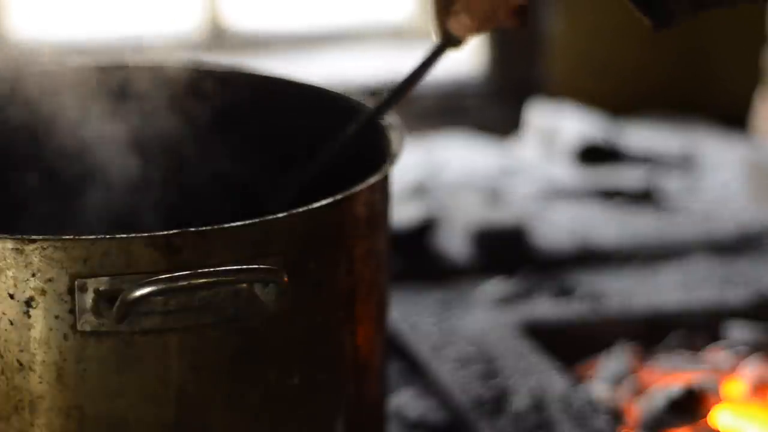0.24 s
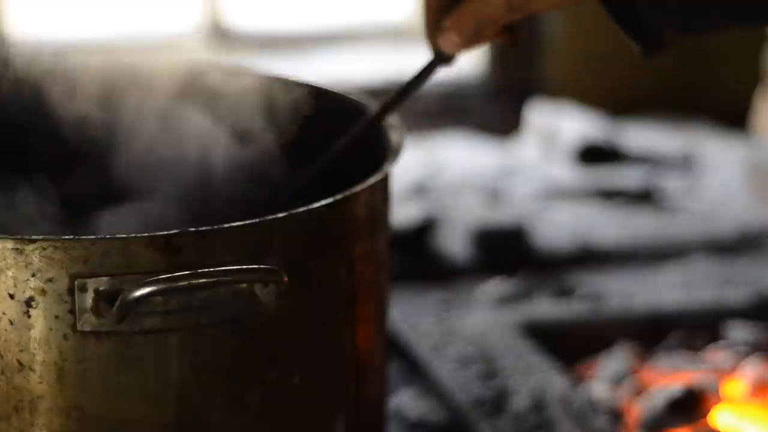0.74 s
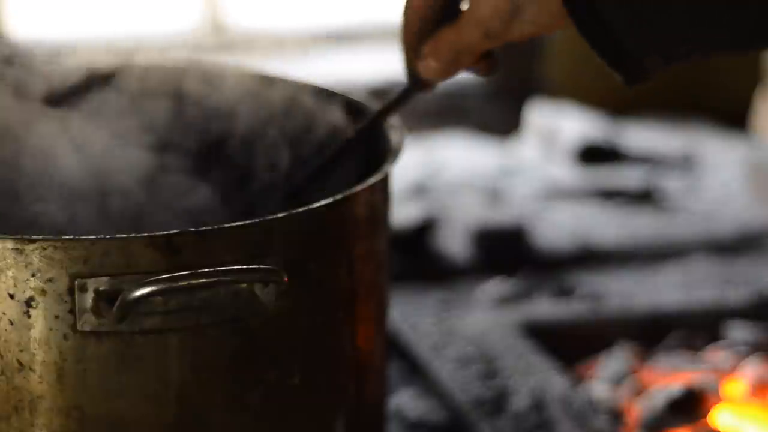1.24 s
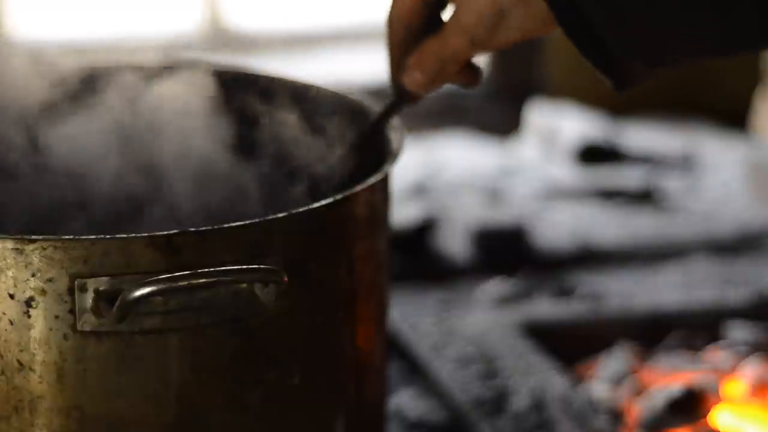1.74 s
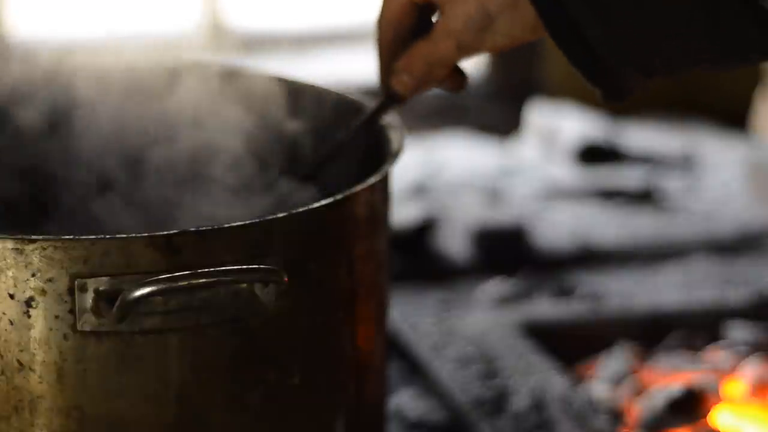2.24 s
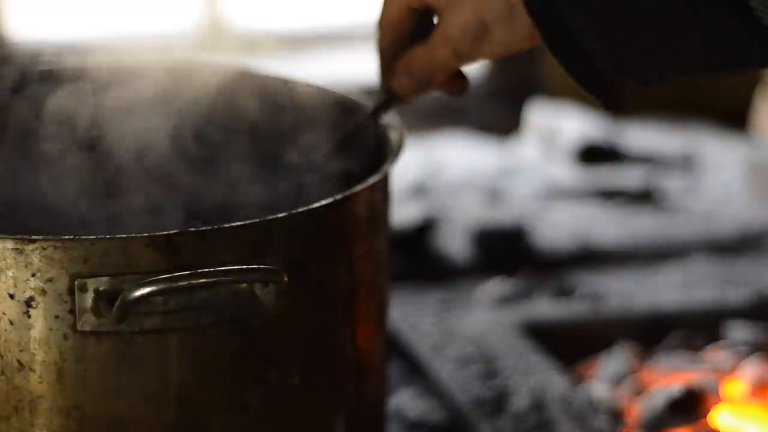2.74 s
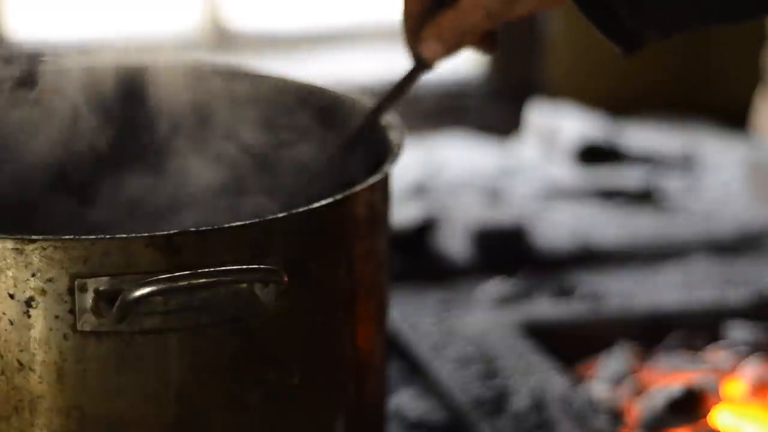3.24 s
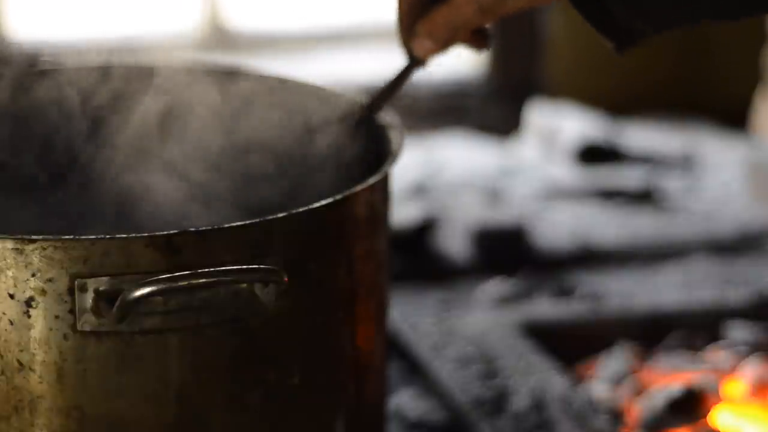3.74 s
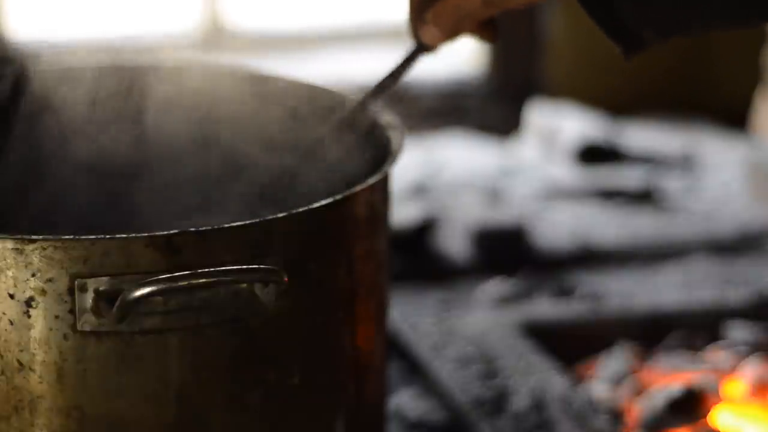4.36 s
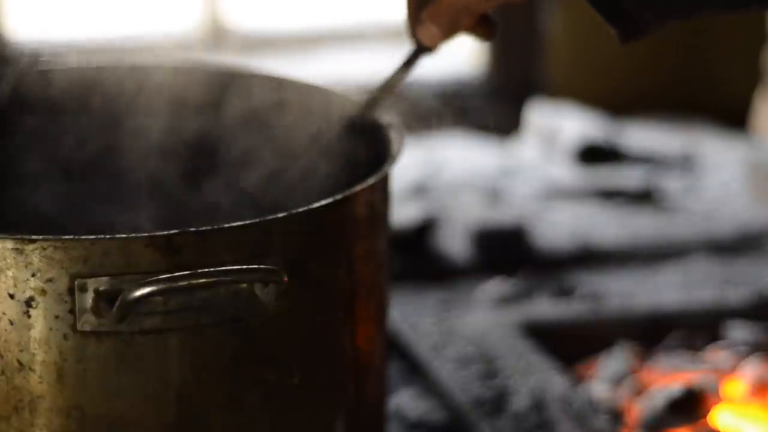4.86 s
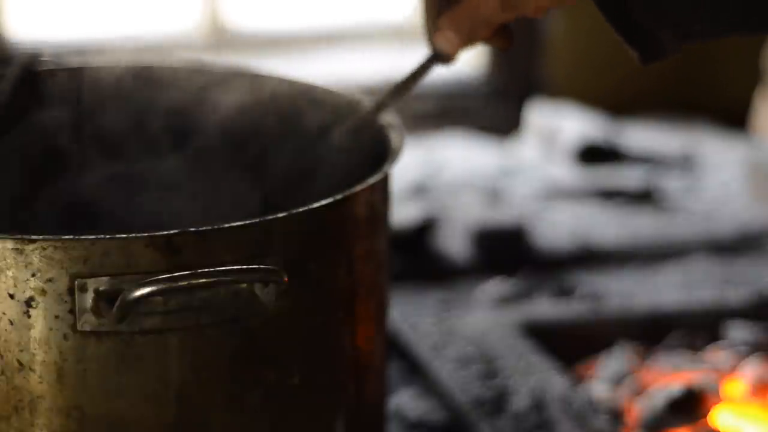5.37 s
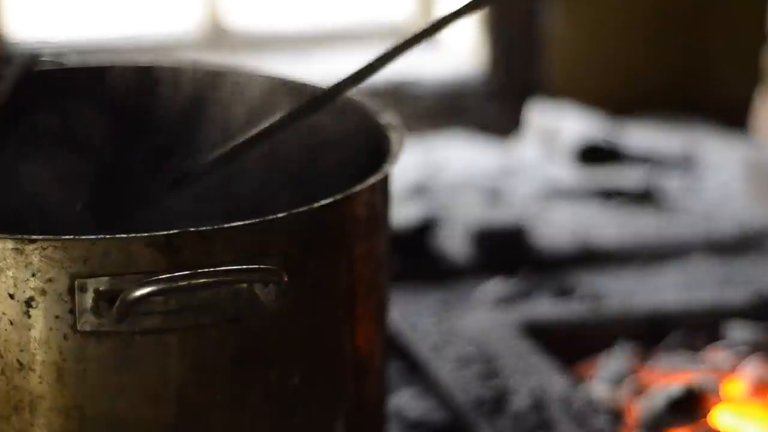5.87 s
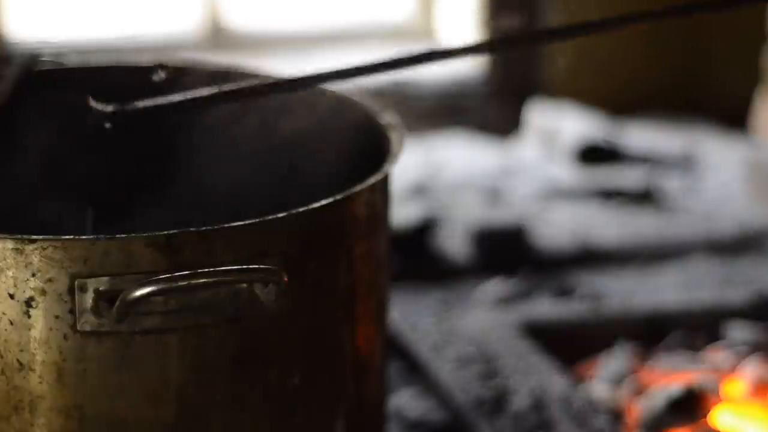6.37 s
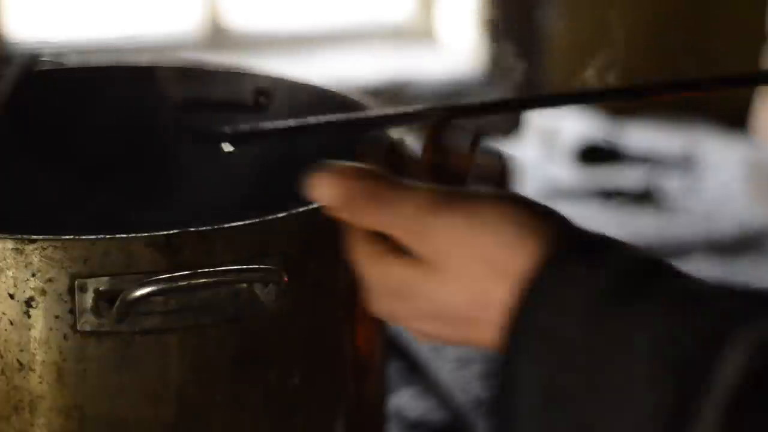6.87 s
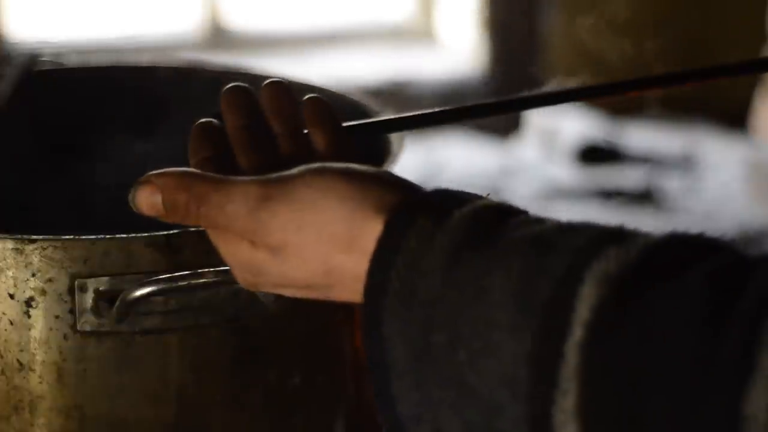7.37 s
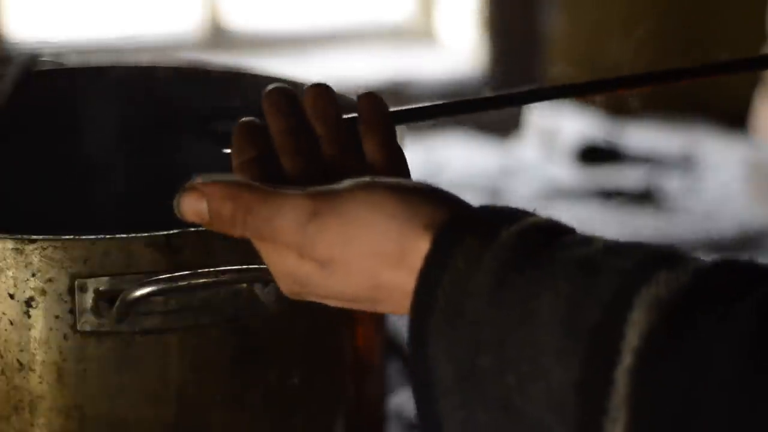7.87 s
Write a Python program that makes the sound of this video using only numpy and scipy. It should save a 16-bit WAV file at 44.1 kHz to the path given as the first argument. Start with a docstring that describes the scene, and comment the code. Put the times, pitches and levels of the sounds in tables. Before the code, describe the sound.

A red-hot steel rod swished in a pot of water fizzes in quick fading puffs, then gurgles, pops and knocks metal before a soft forge roar.

```python
"""Steam fizzes in puffs, about five a second, as a red-hot rod is swished in a steel pot of water.
The fizz (dense random clicks) fades; the water gurgles and pops (sines of climbing pitch, noise).
Spits are noise bursts; knocks of the rod on the pot wall are fading sines and coloured noise.
The rod is lifted out, a few drops fall back (clusters of fading sines), and the soft roar of
the forge (coloured noise, there throughout) is left; a sleeve swishes softly over it (noise)."""
import sys
import numpy as np
from scipy import signal
from scipy.io import wavfile

SR = 44100
rng = np.random.default_rng(int(sys.argv[2]) if len(sys.argv) > 2 else 0)


def persist_wave(psi):
    """Save psi, clipped to +-1, as 16-bit WAV."""
    counts = np.round(np.clip(psi, -1, 1) * 32767).astype(np.int16)
    wavfile.write(sys.argv[1], SR, np.atleast_2d(counts).T)


N = 357210

# puffs of steam, one a stroke, weaker as the rod cools: peak_s, level_db (of the fizz at 6-14 kHz)
STEAM_PUFFS = [(0, -44), (.13, -35.5), (.31, -35.5), (0.538, -38.5), (0.762, -37.5), (.96, -39),
               (1.178, -38), (1.41, -42), (1.628, -43.5), (1.848, -47.5), (2.06, -51), (2.28, -49),
               (2.5, -52.5), (2.71, -49)]
# a hot rod flashes at once, a cooler one swells: the extra rise speed halves every RISE_HALVES_S
RISE_EXTRA_DB_PER_S, RISE_HALVES_S, RISE_SLOWEST_DB_PER_S = 357.5, 0.25, 81
PUFF_FALL_DB_PER_S = 91.5
# tone colour of the fizz before the pot air: pitch_hz, level_db (per Hz, relative)
FIZZ_COLOUR = [(59, -54), (100, -26.5), (358, -22.5), (1250, -17), (1390, 0), (1580, -11.5), (1800, -8.5),
               (8280, -15), (16000, -33.5)]
# resonances of the air above the water: pitch_hz, width_hz, level_db (before each source's boost)
AIR_RESONANCES = [(356, 68, 2.5), (734, 41, -5.5), (1380.7, 17, 4.5), (1800, 30, -5.5), (2377, 41, -9),
                  (2921, 14, -3), (3590, 20, -1.5), (4644, 410, -15), (8300, 300, -13.5)]
# tone colour of the forge's roar: pitch_hz, level_db (per Hz, relative)
FORGE_COLOUR = [(15, -37), (25, -5.5), (114, -15), (394, -6.5), (754, -5.5), (2480, -22.5), (4030, -25.5),
                (5730, -29), (8360, -32.5), (16000, -44)]
FORGE_DB = -55.5   # loudness of the steady roar (rms)
# how hard the water churns: time_s, level_db (before surges, flicker and pot air)
STIR_LEVEL = [(0, -46.5), (.22, -43), (.52, -49.5), (1.03, -50.5), (1.68, -60.5), (2.05, -44.5),
              (2.39, -43), (3.07, -48), (3.45, -42.5), (3.76, -41.5), (4.41, -36.5), (5.32, -38.5),
              (5.6, -46), (5.74, -87)]
# tone colour of the stirred water: pitch_hz, level_db (per Hz, relative)
WATER_COLOUR = [(120, -52), (200, -39.5), (719, 0.5), (1390, 3.5), (1520, -6.5), (1780, 3.5),
                (14000, -44.5)]
# water slapping the wall: start_s, level_db (before the pot air)
WALL_SLAPS = [(0.079, -19.5), (0.275, -16.5), (1.123, -17.5), (2.0016, -28), (2.216, -18), (2.2493, -23),
              (3.5125, -28), (3.718, -19.5), (3.919, -26.5), (4.11, -15.5), (4.365, -15), (4.497, -18.5),
              (4.876, -19), (5.1487, -35), (5.25, -47), (5.446, -19)]
SURGE_DB, SURGE_S = 5.5, .05   # span of the swell with each loud bubble; time to settle to 37 %
# loud bubbles of low to high pitch: start_s, level_db (before the pot air), pitch_hz (at the start)
LOUD_BUBBLES = [(0.076, -27, 1825), (0.154, -16.5, 732), (0.279, -22, 1036), (0.339, -24, 858),
                (0.961, -31, 1380), (1.049, -28, 689), (1.123, -23, 1337), (1.807, -21, 760),
                (1.983, -25.5, 1415), (2.249, -22.5, 1844), (2.289, -23, 927), (3.204, -25.5, 3000),
                (3.588, -19.5, 775), (3.711, -20.5, 1430), (3.789, -23, 805), (3.904, -21.5, 798),
                (3.922, -19, 1330), (4.118, -17.5, 758), (4.239, -19, 894), (4.31, -21, 1422),
                (4.425, -24, 652), (4.495, -24, 710), (4.689, -15, 1695), (4.748, -17, 1814),
                (4.812, -18.5, 823), (4.927, -20.5, 583), (5.068, -16.5, 833), (5.146, -26.5, 800),
                (5.24, -23, 1332), (5.314, -21.5, 758), (5.492, -17.5, 844)]
# steam escaping through a closing gap: start_s, level_db, first_hz, last_hz, glide_s, length_s
STEAM_SQUEAL = (.77, -30, 4300, 6600, .02, .08)
# sharp spits at the surface: start_s, level_db, centre_hz
SURFACE_SPITS = [(2.2179, -33, 6100), (3.548, -38, 7600), (3.7695, -46, 8300), (4.3173, -35, 6060),
                 (4.3655, -41, 6200), (4.7036, -39, 7600), (4.748, -24.5, 7200), (4.7664, -29.5, 6330),
                 (4.871, -34, 5800), (5.0706, -36, 7250), (5.11, -34, 6960), (5.142, -37, 8200),
                 (5.1966, -33.5, 7800), (5.5043, -29, 6000)]
SMALL_SPITS_SPAN_S, SMALL_SPITS_FADE_DB = (3.5, 6.35), 15   # first and last time; loss over it
# dull taps: start_s, level_db
DULL_TAPS = [(5.861, -34), (7.051, -28), (7.93, -34.5)]
# rod against the pot: start_s, level_db, treble_db_per_octave, ring_share (times the fade times),
# low_ring_db (added below 680 Hz)
ROD_KNOCKS = [(2.392, -21, -2.5, 1.2, 1), (2.45, -6, -1.5, 1.14, -9), (2.645, -12.5, -1, 1.7, -8),
              (2.859, -3.5, 1, 1.78, -8.5), (3.064, -7, 1.5, 1.14, 1.5), (3.26, -6.5, 4.5, 1.18, 6.5),
              (4.173, -11.5, -0.5, 0.73, -14)]
# ringing modes of the pot wall: pitch_hz, level_db (relative), fade_s (to -60 dB, before ring_share)
WALL_MODES = [(573.4, -1.5, 0.3), (753, -15, 0.39), (934, -13, 0.23), (1510, 1.5, 0.099), (1940, -3, 0.25),
              (1850, -5, 0.15), (1365, -11.5, 0.15), (2074, -9.5, 0.17), (2480, -8, 0.15),
              (3064, -6.5, 0.11)]
# many small, dense wall modes: pitch_hz, level_db (per Hz, relative)
CLATTER_COLOUR = [(150, -47), (300, -13.5), (570, -14), (660, -15.5), (920, 7), (1250, -0.5), (1490, 0.5),
                  (2210, -3.5), (4010, -2), (5000, -23), (5900, -45.5), (15000, -49.5)]
# how long the clatter lasts: pitch_hz, fade_s (to -60 dB, before ring_share)
CLATTER_FADE = [(200, 1), (900, 0.23), (3000, 0.18), (5000, 0.063), (9000, 0.04)]
# drops falling back: start_s, level_db, pitch_hz (centre of the cluster), fade_s (to -60 dB)
FALLING_DROPS = [(5.673, -49, 2750, 0.089), (5.721, -46, 2240, 0.12), (5.916, -33.5, 1916, 0.15),
                 (6.025, -34, 2110, 0.081), (7.893, -35, 3275, 0.19), (7.933, -37, 416, 0.06)]
ROOM_FADE_S, WALL_CUT_HZ, ROOM_DB = 0.26, 6200, -17   # fade to -60 dB in the bass; echo treble; gain
# dips from the microphone housing: pitch_hz, width_hz, depth (0-1)
HOUSING_DIPS = [(5697, 410, 1), (6740, 228, .4), (14600, 360, .7)]
CUTOFF_HZ = 16300


def amp(db):
    """Turn decibels into a gain."""
    return np.exp(np.asarray(db) * (np.log(10) / 20))


def rms_one(x):
    """Scale a sound to rms 1."""
    return x / np.sqrt(np.mean(x ** 2) + 1e-20)


def at_hz(points, hz):
    """Read a table between its points, with pitch spaced as the ear hears it (log scale)."""
    table_hz, values = np.array(points).T
    return np.interp(np.log(hz), np.log(table_hz), values)


def in_time(rows):
    """Turn a level curve into a gain for every sample, near silence (-120 dB) after its end."""
    s, db = np.transpose(rows)
    return amp(np.interp(np.arange(N) / SR, s, db, right=-120))


def drift(rate_hz):
    """Wander by slow chance: noise smoothed by two equal low-passes at rate_hz; spread 1."""
    step = 40   # samples between slow values
    r = np.exp(-2 * np.pi * rate_hz * step / SR)
    noise = rng.standard_normal(N // step + 2002)
    slow = rms_one(signal.lfilter([1], [1, -2 * r, r * r], noise)[2000:])
    return np.interp(np.arange(N) / step, np.arange(len(slow)), slow)


def resonance(x, hz, width_hz):
    """Let a narrow range of pitches through, as a resonator does, with gain 1 on top."""
    r = np.exp(-np.pi * width_hz / SR)
    top = np.array([1, 0, -1]) * (1 - r * r) / 2
    return signal.lfilter(top, [1, -2 * r * np.cos(2 * np.pi * hz / SR), r * r], x + 1e-18)


def bands(rows):
    """Split into bands of 0.4 octave, taken from two rows in turn: centre pitch and sound."""
    edges = 22 * 2 ** (np.arange(25) / 2.5)
    for k, (low, high) in enumerate(zip(edges, edges[1:])):
        sos = signal.butter(2, [low, high], "band", fs=SR, output="sos")
        yield np.sqrt(low * high), signal.sosfilt(sos, rows[k % 2])


def coloured(rows, spectrum, patchy_db, rate_hz):
    """Give noise a tone colour; every band flickers, partly together; rms 1."""
    together = drift(rate_hz)
    total = 0
    for hz, band in bands(rows):
        flicker = 0.53 * together + drift(rate_hz)
        total = total + amp(at_hz(spectrum, hz) + patchy_db * flicker) * band
    return rms_one(total)


def add(out, s, sound):
    """Mix a short sound in at time s."""
    i = round(s * SR)
    out[i:i + len(sound)] += sound[:N - i]


def grains(per_s, spread_db):
    """Scatter random clicks of uneven size and either sign in two rows; rms 1."""
    sizes = amp(spread_db * np.minimum(rng.exponential(1, (2, N)), 5))
    signs = rng.choice([-1, 1], (2, N))
    struck = rng.random((2, N)) < per_s / SR
    return rms_one(sizes * signs * struck)


def pot_air(x, boost_db):
    """Sound from the water surface leaves through the resonant air column."""
    return x + sum(amp(db + boost_db) * resonance(x, hz, width) for hz, width, db in AIR_RESONANCES)


def bubble(hz, fade_s, rise):
    """A fading sine that climbs, rise in octaves per second, as the cavity nears the surface."""
    t = np.arange(round(max(fade_s, .003) * SR)) / SR
    phase = 2 * np.pi * np.cumsum(hz * 2 ** (rise * t)) / SR
    onset = 1 - np.exp(-t * hz / 5.0)   # builds up over about five swings
    return np.sin(phase) * amp(-60 * t / fade_s) * onset


def burst(hz, width_hz, fade_s):
    """A short fading noise, filtered twice around a centre pitch; peak 1."""
    t = np.arange(3000) / SR
    noise = rng.standard_normal(len(t)) * amp(-60 * t / fade_s) * (1 - np.exp(-t / 0.00124))
    noise = resonance(resonance(noise, hz, width_hz), hz, width_hz)
    return noise / np.abs(noise).max()


def puffs():
    """Gain of the steam: each puff climbs to its peak and falls away; the strongest one is heard."""
    s, db = np.transpose(STEAM_PUFFS)[:, :, None]
    step = 32   # samples between gain values
    since = np.arange(0, N, step) / SR - s
    rise = RISE_SLOWEST_DB_PER_S + RISE_EXTRA_DB_PER_S * 2 ** (-s / RISE_HALVES_S)
    level = (db + np.minimum(rise * since, -PUFF_FALL_DB_PER_S * since)).max(axis=0)
    return np.repeat(amp(level), step)[:N]


def fizz():
    """Thousands of tiny steam bubbles burst each second, heard through the pot air."""
    bursts = grains(per_s=9000, spread_db=1.5)
    sound = pot_air(coloured(bursts, FIZZ_COLOUR, patchy_db=2.85, rate_hz=19), boost_db=10.0)
    treble_filter = signal.butter(4, [6000, 14000], "band", fs=SR, output="sos")
    treble = signal.sosfilt(treble_filter, sound)
    return puffs() * sound / np.std(treble)


def forge_roar():
    """A soft, steady roar: coloured noise that flickers gently."""
    noise = rng.standard_normal((2, N))
    return amp(FORGE_DB) * coloured(noise, FORGE_COLOUR, patchy_db=.4, rate_hz=4)


def random_bubbles(cycles=45, per_s=300, spread_db=2.8):
    """Bubbles at chance times and pitches, each fading 60 dB in a set number of swings."""
    blips, draws = np.zeros(N), rng.random((2000, 4))
    times = np.cumsum(-np.log(draws[:, 0]) / per_s)
    for s, (_, size, loud, climb) in zip(times, draws):
        hz = 350 * 16 ** size
        if s < STIR_LEVEL[-1][0]:
            gain = amp(at_hz(WATER_COLOUR, hz) - spread_db * np.log(loud + .03)) * np.sqrt(hz)
            add(blips, s, gain * bubble(hz, cycles / hz, rise=12 * climb ** 2))
    return blips / np.std(blips[:round(STIR_LEVEL[-1][0] * SR)])


def water(rush_db=-1):
    """Random bubbles over a rush of stirred water; slaps are sudden bright bursts of the rush."""
    clicks = grains(per_s=4300, spread_db=-1.0)
    rush = coloured(clicks, WATER_COLOUR, patchy_db=5.5, rate_hz=14)
    churn = random_bubbles() + amp(rush_db) * rush
    t, slaps, surge = np.arange(SR // 4) / SR, np.zeros(N), np.zeros(N)
    for s, db in WALL_SLAPS:
        add(slaps, s, amp(db - 60 * t / 0.11) * (1 - np.exp(-t / 0.0021)))
    # the churning swells with every loud bubble and settles again
    for s, *_ in LOUD_BUBBLES:
        add(surge, s, np.exp(-t / SURGE_S))
    churn = churn * amp(SURGE_DB * (np.minimum(surge, 1) - .5))
    bright = resonance(resonance(rush, 3700, 5500), 3800, 9200)
    bright = rms_one(bright) / 4   # noise peaks at about four times its rms
    flicker = amp(2.2 * drift(13))
    return pot_air(flicker * in_time(STIR_LEVEL) * churn + slaps * bright, boost_db=7)


def loud_bubbles():
    """Each bubble rings at its own pitch in a rough gulp and sheds four weaker ones."""
    out = np.zeros(N)
    for (s, db, hz), draw in zip(LOUD_BUBBLES, rng.random((len(LOUD_BUBBLES), 8))):
        add(out, s, amp(db) * bubble(hz, 0.067, rise=3.5))
        add(out, s, amp(db - 7) * burst(hz * 1.1, hz * .6, fade_s=.11))
        for late, higher in draw.reshape(4, 2):
            weaker = bubble(hz * (0.94 + 0.29 * higher), 0.074, rise=7)
            add(out, s + .006 + 0.029 * late, amp(db - 13) * weaker)
    return pot_air(out, boost_db=0.0)


def squeal():
    """Steam squeezes through a closing gap: one sine glides upward and dies away."""
    out = np.zeros(N)
    s, db, first_hz, last_hz, glide, length = STEAM_SQUEAL
    t = np.arange(round(length * SR)) / SR
    hz = last_hz + (first_hz - last_hz) * np.exp(-t / glide)
    shape = np.sqrt(np.sin(np.pi * t / length)) * (1 - t / length)
    add(out, s, amp(db) * np.sin(2 * np.pi * np.cumsum(hz) / SR) * shape)
    return out


def spits(small_db=-51, spread_db=5.0):
    """Sharp noise bursts, a scatter of small ones that fades as the rod is lifted, and dull taps."""
    out = np.zeros(N)
    for s, db, hz in SURFACE_SPITS:
        sparkle = 0.16 * burst(12200, 3100, fade_s=0.033)
        add(out, s, amp(db) * (burst(hz, hz * 0.32, fade_s=0.028) + sparkle))
    for when, size, loud in rng.random((70, 3)):
        s = np.interp(when, (0, 1), SMALL_SPITS_SPAN_S)
        hz = 6000 * 1.79 ** size
        db = small_db - SMALL_SPITS_FADE_DB * when ** 2 - spread_db * np.log(loud + .05)
        add(out, s, amp(db) * burst(hz, hz * .22, fade_s=0.025))
    for s, db in DULL_TAPS:
        thud = .35 * burst(700, 900, fade_s=.12)
        add(out, s, amp(db) * (burst(1100, 1100, fade_s=.012) + thud))
    return out


def knocks(modes_db=-17, clatter_db=-8):
    """Each blow rings the wall modes with new strengths, plus a dense clatter that dies by band."""
    out, t = np.zeros(N), np.arange(SR // 2) / SR
    for s, db, treble_db, share, low_db in ROD_KNOCKS:
        def tilt(hz):
            """Each blow has its own brightness; its place sets how much the lowest motion rings."""
            return treble_db * np.log2(hz / 1500) + low_db * (hz < 680)

        ring = 0
        for hz, level, fade_s in WALL_MODES:
            # sloshing water splits each mode into three detuned pitches
            trio = hz * (1 + rng.normal(0, .012, (3, 1)))
            mode_db = level + tilt(hz) + rng.normal(0, 3) - 60 * t / (fade_s * share)
            ring = ring + amp(mode_db) * np.sin(2 * np.pi * trio * t).sum(axis=0)
        crack = 1 + 0.3 * np.exp(-t / 0.0029)   # the first contact cracks
        noise = rng.standard_normal((2, len(t))) * (1 - np.exp(-t / .0003)) * crack
        clatter = 0
        for hz, band in bands(noise):
            fade_db = 60 * t / (share * at_hz(CLATTER_FADE, hz))
            clatter = clatter + amp(at_hz(CLATTER_COLOUR, hz) + tilt(hz) - fade_db) * band
        clatter = clatter / np.std(clatter[:900])   # even loudness over the first 20 ms
        add(out, s, amp(db) * (amp(modes_db) * ring + amp(clatter_db) * clatter))
    no_bass = signal.butter(4, 260, "high", fs=SR, output="sos")   # a small wall radiates no bass
    return signal.sosfilt(no_bass, out + 1e-18)


def drops():
    """A drop rings as a cluster of close, nearly steady pitches that beat, on a small splash."""
    out = np.zeros(N)
    for (s, db, hz, fade_s), draw in zip(FALLING_DROPS, rng.normal(0, 1, (len(FALLING_DROPS), 5))):
        cluster = sum(bubble(hz * (1 + 0.0358 * d), fade_s, rise=0.4) for d in draw)
        add(out, s, amp(db) * cluster / np.sqrt(len(draw)))
        add(out, s, amp(db - 5) * burst(hz * .85, hz * .6, fade_s=.1))
    return out


def sleeve_swish(noise):
    """A sleeve swishes softly near 6.9 s: noise around 2 kHz that swells and dies away."""
    swell = np.exp(-((np.arange(N) / SR - 6.9) / .25) ** 2)
    return 1.73 * swell * resonance(noise, 2000, 2400)


def workshop(x):
    """Room echo: ten feedback delays, duller on every round, stepped block by block."""
    out, dull = np.zeros(N), np.exp(-2 * np.pi * WALL_CUT_HZ / SR)
    for k, lag in enumerate((np.geomspace(.011, .041, 10) * SR).astype(int)):
        loop, gain, state = x.copy(), amp(-60 * lag / SR / ROOM_FADE_S), [0.]
        for i in range(lag, N, lag):
            back, state = signal.lfilter([gain * (1 - dull)], [1, -dull], loop[i - lag:i], zi=state)
            loop[i:i + lag] += back[:N - i]
        out += (loop - x) * (-1) ** k   # echoes only, with alternating sign
    return out


def scene():
    """Water and rod echo in the room, over the forge and a passing sleeve swish."""
    pot = fizz() + water() + loud_bubbles() + squeal() + spits() + knocks() + drops()
    forge = forge_roar()
    sleeve = sleeve_swish(forge[::-1])   # reversed samples give a ready-made soft noise
    return (pot + amp(ROOM_DB) * workshop(pot) + forge + sleeve)[None]


def record(dry):
    """Narrow dips from the housing, hard overload at full scale, the top is cut."""
    for hz, width, depth in HOUSING_DIPS:
        dry = dry - depth * resonance(dry, hz, width)
    top_cut = signal.cheby2(18, 60, CUTOFF_HZ, fs=SR, output="sos")
    return signal.sosfilt(top_cut, np.clip(dry, -1, 1))


dry = scene()
out = record(dry)
persist_wave(out)
```